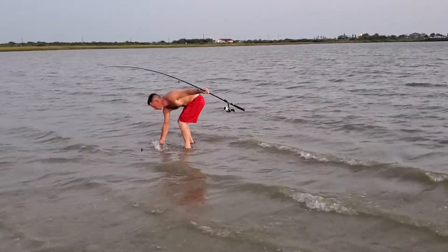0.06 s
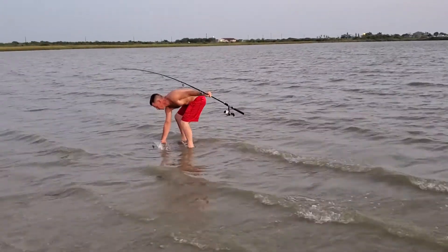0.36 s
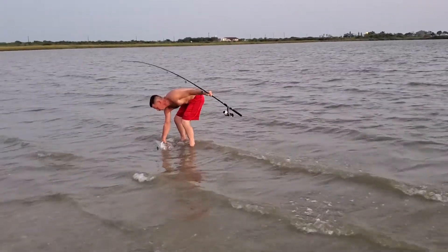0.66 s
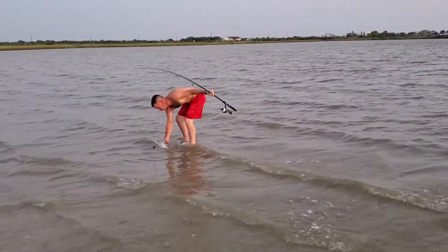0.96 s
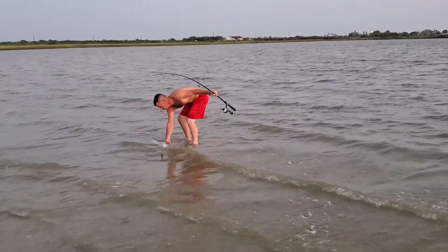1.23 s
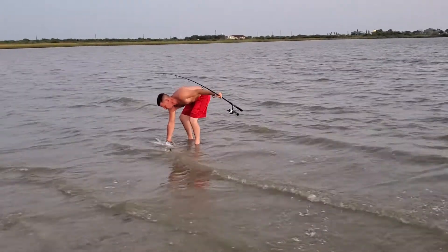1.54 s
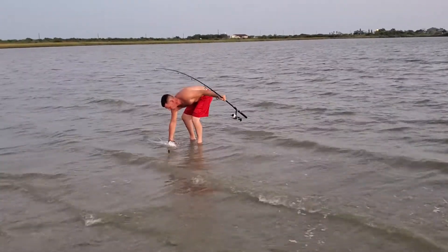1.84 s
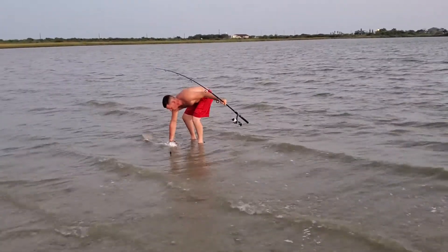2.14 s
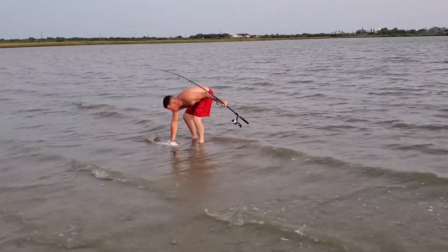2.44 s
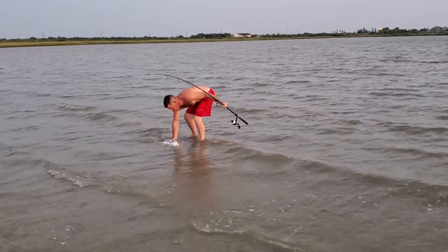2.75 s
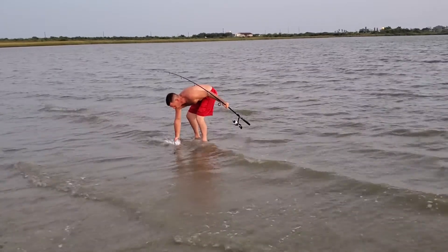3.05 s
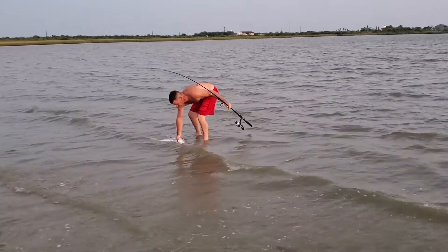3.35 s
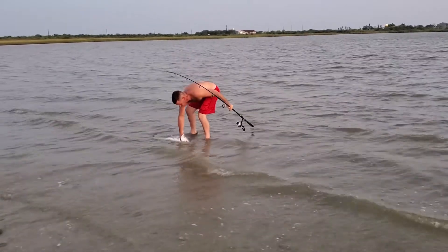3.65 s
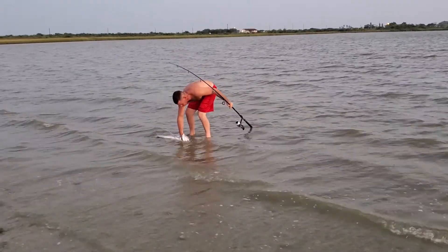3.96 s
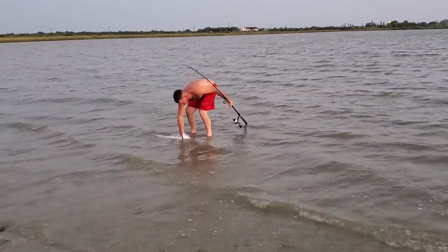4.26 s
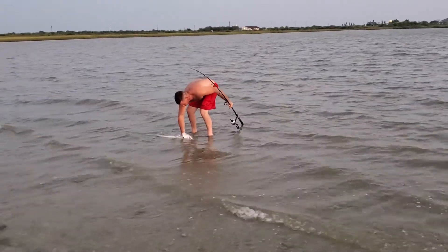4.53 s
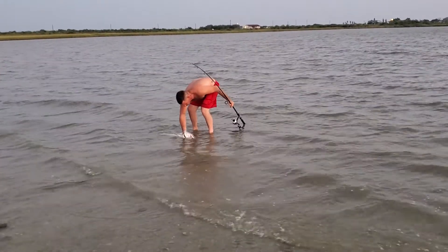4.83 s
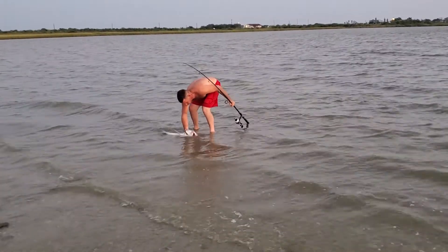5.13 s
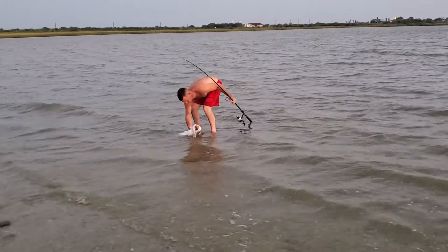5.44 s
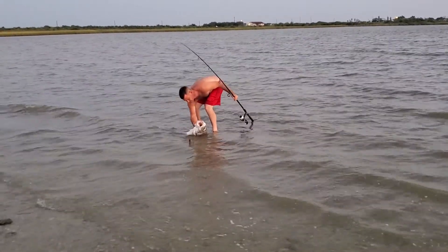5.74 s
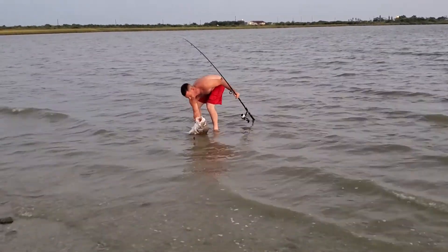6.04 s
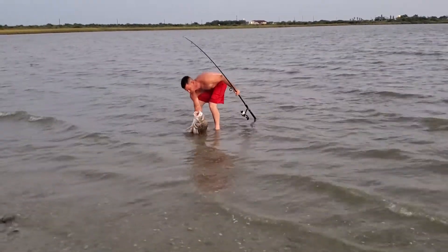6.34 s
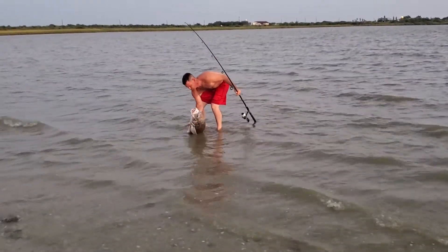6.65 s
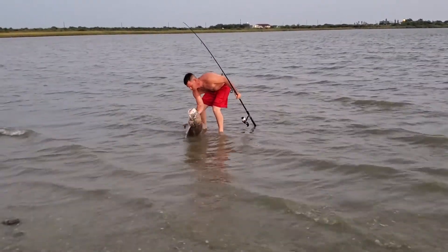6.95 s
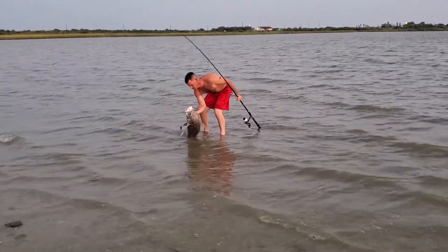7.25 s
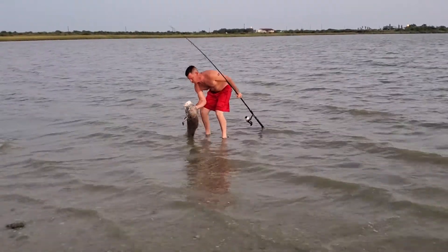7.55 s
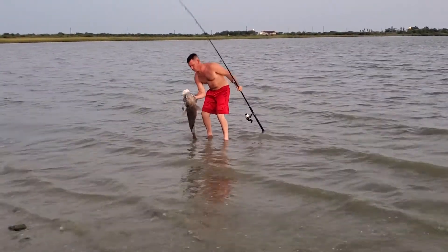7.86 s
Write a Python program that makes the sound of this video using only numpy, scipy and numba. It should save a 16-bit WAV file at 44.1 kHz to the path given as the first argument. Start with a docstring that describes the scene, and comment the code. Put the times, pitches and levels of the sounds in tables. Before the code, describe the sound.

Wavelets wash and gurgle along a bay shore, with faint plops, ticks and low wind buffeting.

```python
"""The water's edge of a wide bay, a two-port microphone facing small wind waves over the shallows.
Each spilling crest rings clouds of bubbles, right, ahead and left: big ones gurgle, small ones splash,
the finest fizz as foam. In front, single bubbles plop and tick, wavelets slap and drips fall back.
Wind eddies rumble and thump on the ports and rise to a gust at the end."""
import sys
import numpy as np
from scipy import signal
from scipy.fft import rfft, irfft, next_fast_len
from scipy.io import wavfile
from numba import njit

SR = 44100
rng = np.random.default_rng(int(sys.argv[2]) if len(sys.argv) > 2 else 0)


def generate_wav(signal):
    """Clip the signal to [-1, 1] and save it as 16-bit WAV at the path in sys.argv[1]."""
    frames = np.transpose(np.atleast_2d(signal))
    scaled = np.clip(frames, -1, 1) * 32767
    pcm = np.round(scaled).astype(np.int16)
    wavfile.write(sys.argv[1], SR, pcm)


N = 352359
CUTOFF_HZ = 15850

# where and how the crests spill: (time [s], lean to the left [dB per ms of lead], spray [dB], plume [dB])
CRESTS = [(0, 2.5, -0.5, .5), (1.2, 1, 1.5, 3.5), (2.0, -4.5, -1, 1), (2.8, -4.5, -2, 0),
          (3.8, -7, 1.5, 0.5), (4.6, 3, -1.5, 2.5), (5.8, -3, 2, 0.5), (6.7, 1, 1, -1), (7.2, 5, 2.5, -3.5),
          (7.99, 2.5, 3, 0.5)]


def from_db(db):
    """Decibels to gain."""
    return 10 ** (np.asarray(db) / 20)


def unit_rms(x):
    """Scale to an rms of one."""
    return x / np.sqrt(np.mean(x ** 2) + 1e-20)


def in_time(rows):
    """The columns of a timed table at every sample."""
    times, *columns = np.transpose(rows)
    return [np.interp(np.arange(N) / SR, times, column) for column in columns]


def coloured(x, points, band=None):
    """Filter by a (frequency [Hz], gain [dB]) table, and keep only a band [Hz] if one is given."""
    size = next_fast_len(N + SR // 8)
    hz = np.maximum(np.arange(size // 2 + 1) * SR / size, 1)
    knots, db = np.transpose(points)
    gain = from_db(np.interp(np.log(hz), np.log(knots), db))
    if band:
        gain = gain / np.sqrt((1 + (band[0] / hz) ** 12) * (1 + (hz / band[1]) ** 12))
    return irfft(rfft(x, size) * gain, size)[..., :N]


def drift(rate_hz):
    """A slow random wander with an rms of one."""
    step, settle = 40, 2000
    pole = np.exp(-2 * np.pi * step * rate_hz / SR)
    noise = rng.standard_normal(N // step + settle + 2)
    slow = signal.lfilter([1], [1, -2 * pole, pole * pole], noise)[settle:]
    return np.interp(np.arange(N) / step, np.arange(len(slow)), unit_rms(slow))


def add(out, start_s, sound):
    """Mix a short sound in."""
    at = max(int(start_s * SR), 0)
    out[..., at:at + sound.shape[-1]] += sound[..., :max(N - at, 0)]


def wind_force(puff_width_s=0.074):
    """Force on each port in dB: the steady wind with bell-shaped puffs on top."""
    # steady wind, the left port mostly in the lee until the gust: (time [s], left [dB], right [dB])
    breeze = [(0.0, -49, -36), (0.5, -46.5, -43.0), (1.5, -60, -43), (2.4, -50.5, -42.5), (3.0, -59, -43.5),
              (3.5, -62.0, -46.5), (3.8, -42.5, -38), (4.4, -57.0, -44), (5.0, -43, -39),
              (5.58, -66, -43.5), (6.3, -46, -40.5), (6.85, -58, -46), (7.15, -42, -41.5),
              (7.5, -31, -32.5), (7.7, -19, -35.5), (7.8, -31.5, -33), (7.99, -33.5, -36.5)]
    # puffs that reach both ports alike: (time [s], level [dB])
    puffs = [(0.09, -41), (0.41, -43), (0.82, -44.5), (0.99, -43), (1.29, -40.5), (1.72, -44), (2.34, -47),
             (2.71, -43.0), (3.3, -46.5), (3.85, -47), (4.14, -43), (4.55, -38), (5.37, -44), (5.73, -40.5),
             (5.95, -45), (6.4, -41), (6.54, -39), (6.68, -38.0), (6.96, -41.5), (7.27, -37)]
    t = np.arange(N) / SR
    puffing = sum(from_db(db) * np.exp(-np.minimum(((t - s) / puff_width_s) ** 2, 20)) for s, db in puffs)
    return 20 * np.log10(np.hypot(from_db(in_time(breeze)), puffing))


def wind(lump_db, lump_hz, level_db, flutter_db, gust_db, growth):
    """Each port has its own lumpy turbulence; small eddies grow faster with the gust than large ones."""
    # spectrum of the large eddies: (frequency [Hz], level [dB])
    rumble_colour = [(15, -19), (30, -10.5), (52, 1), (80, -0.5), (120, -8), (170, -16), (240, -18.5),
                     (400, -40.5), (900, -67), (3000, -77)]
    # spectrum of the small eddies: (frequency [Hz], level [dB])
    flutter_colour = [(70, -18), (135, 1), (172, 1.5), (210, -7.5), (260, -24), (400, -30), (1500, -75)]
    force_db = wind_force()
    lumps = np.array([unit_rms(from_db(depth * drift(lump_hz))) for depth in lump_db])
    rumble = unit_rms(coloured(rng.standard_normal((2, N)), rumble_colour))
    flutter = unit_rms(coloured(rng.standard_normal((2, N)), flutter_colour))
    flutter *= from_db(flutter_db + growth * (force_db - gust_db))
    return lumps * from_db(force_db + level_db) * (rumble + flutter)


def thumps(cycles, level_db):
    """A passing eddy swings the pressure once or twice, out of step at the two ports."""
    # eddies: (time [s], pitch [Hz], left [relative dB], right [relative dB], phase between ports [rad])
    eddies = [(0.544, 91, -28, -23.5, 1.2), (0.979, 80, -28, -31, 0.73), (1.281, 83, -28, -27, 2.8),
              (3.627, 64, -23, -23.5, 0.73), (3.851, 78, -26.5, -27, 2.7), (4.565, 89, -24, -26, 0.74),
              (4.779, 76, -24, -20, 0.66), (5.019, 55, -28, -22, 1.7), (5.365, 66.4, -31, -27, 0.83),
              (5.454, 77, -21, -20, 2.65), (5.917, 86, -25, -25, 2.2), (6.678, 67, -25, -26, 0.61),
              (6.854, 78, -28.5, -28.5, 0.6), (7.483, 79.5, -16, -16, 1.1)]
    out = np.zeros((2, N))
    t = np.arange(-SR // 20, SR // 20) / SR
    for s, hz, left_db, right_db, apart in eddies:
        phase = rng.uniform(0, 2 * np.pi) + np.array([[0], [apart]])
        swing = np.exp(-(t * hz / cycles) ** 2) * np.sin(2 * np.pi * hz * t + phase)
        add(out, s + t[0], swing * from_db(level_db + np.array([[left_db], [right_db]])))
    return out


@njit
def ring(starts, pitches, sizes, lives, rise, onset):
    """Each bubble is a sine that swells, then falls 60 dB, climbing in pitch as it nears the surface."""
    out = np.zeros(N)
    for k in range(len(starts)):
        at, length = int(starts[k] * SR), int(lives[k] * SR) + 2
        height, fade, phase = sizes[k], 1000 ** (-1 / length), 0.
        swell = int(onset * length) + 1
        for i in range(min(swell + length, N - at)):
            out[at + i] += height * min(i / swell, 1) * np.sin(phase)
            phase += 2 * np.pi * pitches[k] / SR * (1 + rise * i / length)
            if i > swell:
                height *= fade
    return out


def bubbles_at_ports(starts, leads_ms, pitches, sizes, lives, rise, onset):
    """Each bubble rings from its own direction; a positive lead reaches the left port first."""
    half_s = leads_ms / 2000
    arrivals = [np.maximum(starts + side * half_s, 0) for side in (-1, 1)]
    return np.array([ring(at, pitches, sizes, lives, rise, onset) for at in arrivals])


def pops(rows, count, cycles, scatter_s, detune_oct, trail_db, rise, onset):
    """For each row, a leading bubble with a trail of quieter ones, from somewhere in front."""
    delay, pitch, place = rng.random((len(rows), 3, count)).transpose(1, 0, 2)
    s, level_db, hz = np.transpose(rows)[:, :, None]
    trailing = np.arange(count) > 0
    starts = s + scatter_s * delay * trailing
    leads_ms = 0.22 * (place - .5)
    pitches = np.minimum(hz * 2 ** (detune_oct * (2 * pitch - 1) * trailing), CUTOFF_HZ)
    sizes = from_db(level_db + trail_db * trailing)
    lives = cycles / pitches
    return bubbles_at_ports(*map(np.ravel, (starts, leads_ms, pitches, sizes, lives)), rise, onset)


def drips():
    """Drips fall back into the water and ring a pair of small bubbles each."""
    # drips: (time [s], relative level [dB], pitch [Hz])
    drops = [(3.302, -48, 3500), (5.202, -38.5, 3500)]
    return pops(drops, count=2, cycles=70, scatter_s=0.0085, detune_oct=.05,
                trail_db=-5, rise=.06, onset=0.04)


def ticks():
    """Droplets and bursting foam tick, high and short."""
    # bursts: (time [s], relative level [dB], pitch [Hz])
    bursts = [(0.172, -39, 13600), (1.134, -43, 14600), (1.161, -38, 15000), (1.808, -42, 12000),
              (3.112, -47, 5590), (3.730, -40, 14500), (3.830, -37, 15000), (4.507, -39, 14000),
              (4.610, -40, 9700), (6.308, -42, 14300), (7.530, -40, 13300)]
    return pops(bursts, count=4, cycles=22, scatter_s=0.007, detune_oct=0.3,
                trail_db=-5.5, rise=.03, onset=0.031)


def slaps():
    """Wavelets slap shut in a tight cluster of quickly damped bubbles."""
    # closing wavelets: (time [s], relative level [dB], pitch [Hz])
    closings = [(0.674, -28.5, 1630), (2.806, -34.5, 1720), (3.02, -34, 1760), (4.396, -37, 1240),
                (4.607, -30, 1190)]
    return pops(closings, count=3, cycles=17, scatter_s=0.00306, detune_oct=0.6,
                trail_db=-4.5, rise=.05, onset=0.02)


def plops():
    """Larger bubbles ring out singly above the wash."""
    # larger bubbles: (time [s], relative level [dB], pitch [Hz])
    bubbles = [(0.744, -30, 720), (0.941, -29, 1900), (1.224, -31, 1780), (1.751, -34, 752),
               (2.925, -32, 1710), (3.112, -31, 1290), (4.364, -32.5, 700), (4.54, -24.5, 2070),
               (4.608, -23.5, 1260), (4.659, -32.5, 846), (6.875, -28, 2400), (7.107, -32, 2230),
               (7.195, -23.5, 1890)]
    return pops(bubbles, count=5, cycles=34, scatter_s=0.013, detune_oct=0.43,
                trail_db=-13.0, rise=0.03, onset=0.062)


def arrive(x, lead_ms):
    """A sound from one side reaches the nearer port first."""
    half = lead_ms * SR / 2000
    return np.array([np.roll(x, -int(np.floor(half + .5))), np.roll(x, int(np.ceil(half)))])


def bubble_cloud(band, lead_ms, count, cycles, spread_db, rise):
    """Bubbles of random size and pitch, even in power across the band, scattered about one direction."""
    when, pitch, size, life, sign, place = rng.random((count, 6)).T
    low, high = band[0] / np.sqrt(2), min(band[1] * np.sqrt(2), CUTOFF_HZ)
    hz = low + (high - low) * pitch
    size_db = spread_db * np.minimum(-np.log(1 - size), 3.5)
    sizes = from_db(size_db) * np.sqrt(hz) * np.sign(sign - .5)
    leads_ms = lead_ms + .16 * (place - .5)
    lives = cycles * (.5 + life) / hz
    return bubbles_at_ports(when * N / SR, leads_ms, hz, sizes, lives, rise, onset=0.31)


def spill(band, count, cycles, spread_db, rise, wash_db, diffuse_db, surge_db, surge_hz):
    """Every stretch of shore surges on its own: near bubbles over the blurred wash of far ones."""
    # stretches of shore, right to left: (lead of the left port [ms], relative level [dB])
    shore = [(-.5, -7.5), (-.1, -9), (0.198, -6.5), (0.459, -9)]
    # spectrum of the water: (frequency [Hz], level [dB])
    water_colour = [(220, -4.5), (450, -7), (650, -2), (1000, -3), (1300, 0.5), (1900, .5), (2400, -4),
                    (3600, -8), (4200, -15), (4900, -17), (5700, -21.5), (8000, -19.5), (12000, -19),
                    (15000, -14.5)]
    lean_db = in_time(CRESTS)[0]
    near = 0
    far = from_db(diffuse_db) * rng.standard_normal((2, N))   # open water, from all sides at once
    for lead_ms, level_db in shore:
        gain = from_db(level_db + lean_db * lead_ms + surge_db * drift(surge_hz))
        near = near + gain * bubble_cloud(band, lead_ms, count, cycles, spread_db, rise)
        far = far + gain * arrive(rng.standard_normal(N), lead_ms)
    near = unit_rms(coloured(near, water_colour, band))
    far = unit_rms(coloured(far, water_colour, band))
    return unit_rms(near + from_db(wash_db) * far)


def water_levels(chop_db, chop_hz):
    """Gurgle, splash and foam in dB: all follow the surf and its chop; each wavelet adds a hump."""
    # how hard the surf runs against its ordinary wash: (time [s], level [dB])
    surf = [(0.0, 5), (0.3, 4), (1.12, 3), (1.45, -0.65), (2.05, -0.55), (2.87, -0.4), (3.0, -3.5),
            (3.47, -5), (3.75, -2.5), (4.3, -1.5), (4.55, 0.5), (4.85, -1), (6.12, -3), (6.5, 0.3),
            (6.82, -0.5), (7.1, 5), (7.55, 4.5), (7.99, 3)]
    # gurgle, splash and foam: (level in ordinary surf [dB], growth [dB per dB of surf])
    voices = [(-53.5, 1.23), (-49, 1.0), (-53, 0.62)]
    # wavelets swelling and sinking: (crest time [s], length [s], gurgle [dB], splash [dB], foam [dB])
    laps = [(1.76, 0.12, 0, 2, 2), (2.402, .09, 1.5, 3, .5), (2.697, .14, 2.5, 1.5, 1),
            (2.907, 0.049, 0, 2.5, 2), (3.116, 0.12, 3.5, 3.5, 0), (3.326, 0.1, 6, 5.5, 1.5),
            (3.58, 0.22, 4, 1, .5), (3.818, 0.2, 2.5, 0.5, 2.5), (4.148, 0.095, 0.5, 4.5, 2),
            (4.38, 0.092, -0.5, 2.5, 3), (4.566, 0.27, 3.5, 3.5, 2.5), (5.22, 0.04, 4.5, -1, 2),
            (5.42, 0.19, 7, 3, 2.5), (5.71, .1, 0.5, -0.5, 1.5), (5.963, 0.17, 7.5, 1.5, 1.5),
            (6.39, 0.21, 1.5, 0.5, 1), (6.71, .14, 3.5, 0.5, 0)]
    t = np.arange(N) / SR
    surf_db = in_time(surf)[0] + chop_db * drift(chop_hz)
    levels = np.array([db + growth * surf_db for db, growth in voices])
    for s, length, *lifts_db in laps:
        hump = np.cos(np.pi * np.clip((t - s) / length, -.5, .5))
        levels += np.outer(lifts_db, hump)
    return levels


def waves(plume_hz=1820, plume_width_hz=300):
    """Crests spill: big bubbles gurgle, small ones splash, the finest fizz as foam."""
    gurgle_db, splash_db, foam_db = water_levels(chop_db=0.73, chop_hz=21)
    _, spray_db, plume_db = in_time(CRESTS)
    gurgle = from_db(gurgle_db) * spill((240, 1100), count=700, cycles=24.8, spread_db=2.5, rise=0.19,
                                        wash_db=0.5, diffuse_db=-13.0, surge_db=2.0, surge_hz=12.0)
    splash = from_db(splash_db) * spill((1100, 5400), count=3200, cycles=39.8, spread_db=2.5, rise=0.11,
                                        wash_db=3.0, diffuse_db=-2.5, surge_db=2.5, surge_hz=16.4)
    foam = from_db(foam_db) * spill((5100, 16500), count=2400, cycles=18.7, spread_db=3.0, rise=0.022,
                                    wash_db=5.0, diffuse_db=13, surge_db=2.5, surge_hz=24)
    # a crest that breaks harder throws more fine spray
    spray_band = coloured(splash, [(1700, -37), (2200, -8), (4400, -0.5), (5200, -23)])
    spray = spray_band * (from_db(spray_db) - 1)
    # one that rolls over gently rings at the pitch of the commonest bubbles in its plume
    plume_band = signal.lfilter(*signal.iirpeak(plume_hz, plume_hz / plume_width_hz, fs=SR), splash)
    plume = plume_band * (from_db(plume_db) - 1)
    leftward = from_db([[.8], [-.8]])
    return (gurgle + splash + spray + plume) * leftward + foam


def port_pair(x):
    """The microphone body between the ports widens some bands and narrows others."""
    # stereo width: (frequency [Hz], side over mid [dB])
    width = [(300, 1.5), (550, -1), (750, -2), (1000, -1.5), (1350, 6.5), (1700, -1.5), (2100, -3.5),
             (2850, 2), (3600, -0.5), (15000, 0.5)]
    mid = coloured(x[0] + x[1], [(hz, -db / 2) for hz, db in width]) / 2
    side = coloured(x[0] - x[1], [(hz, db / 2) for hz, db in width]) / 2
    return np.array([mid + side, mid - side])


def scene():
    """Water in the open air ahead, wind right on the microphone."""
    singles = from_db(-7.5) * plops() + from_db(-1.5) * slaps()
    singles += from_db(8.5) * ticks() + from_db(2) * drips()
    water = port_pair(waves() + singles)
    buffet = wind(lump_db=(2.8, 2.5), lump_hz=29.6, level_db=-0.47,
                  flutter_db=-7.5, gust_db=-23.0, growth=0.3)
    return water + buffet + thumps(cycles=0.65, level_db=-1.5)


def record(dry):
    """A steep low-pass takes off the highest treble."""
    return signal.sosfilt(signal.ellip(12, .1, 80, CUTOFF_HZ, fs=SR, output="sos"), dry)


dry = scene()
out = record(dry)
generate_wav(out)
```